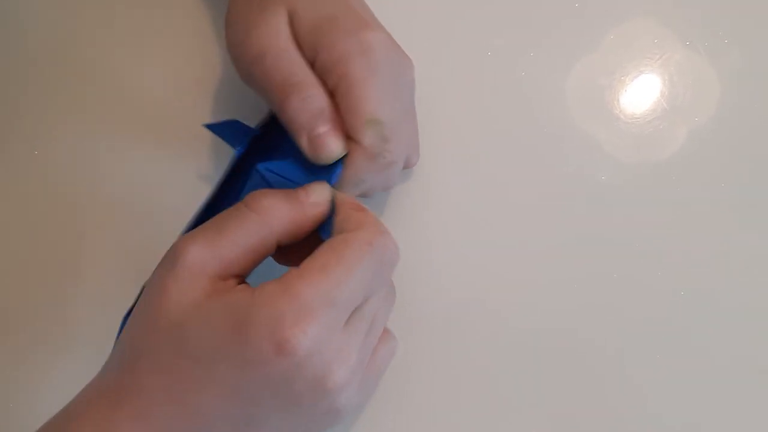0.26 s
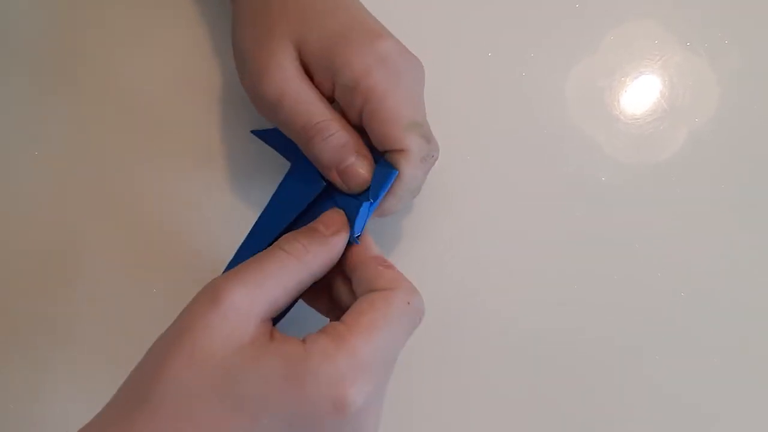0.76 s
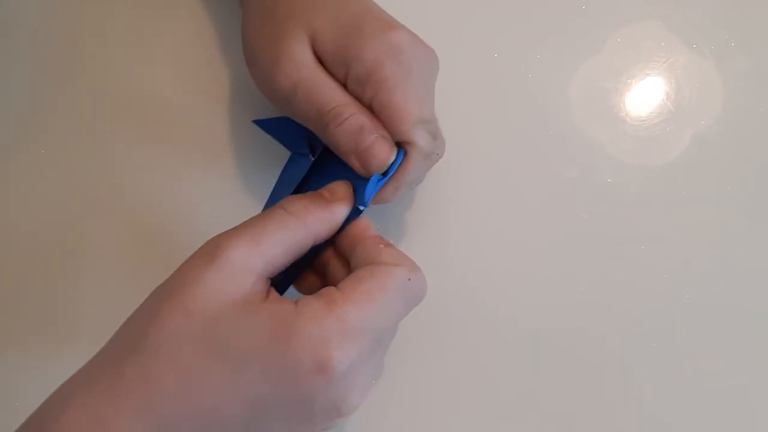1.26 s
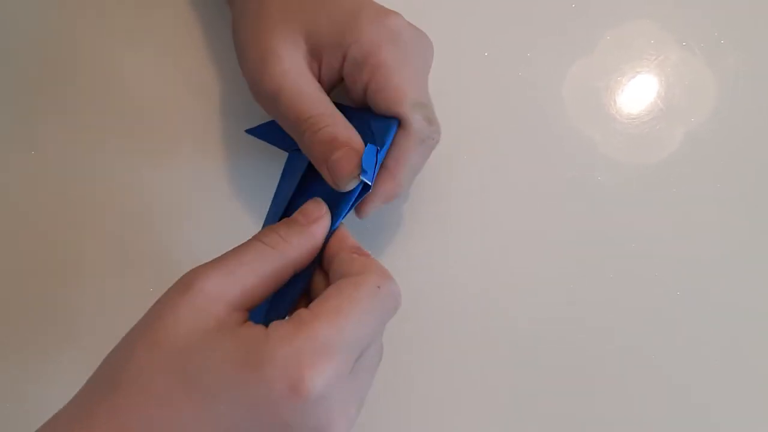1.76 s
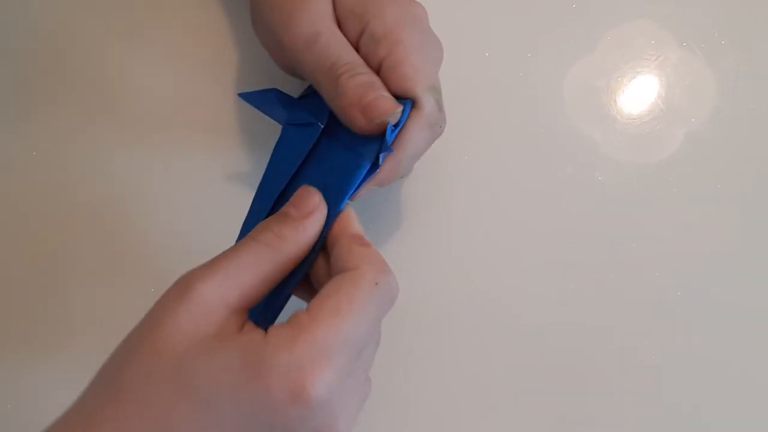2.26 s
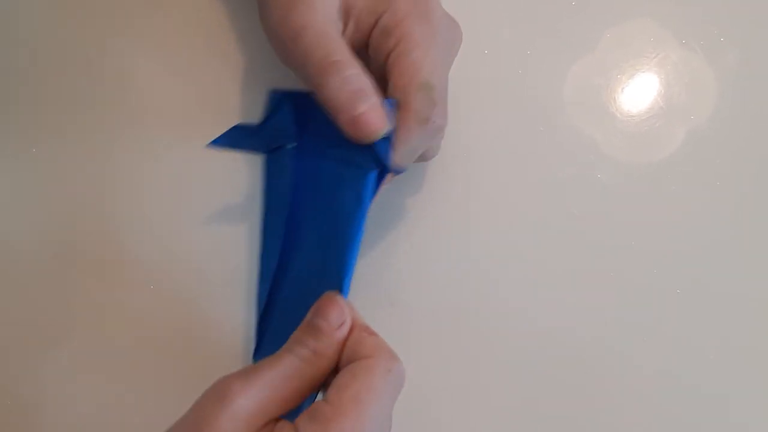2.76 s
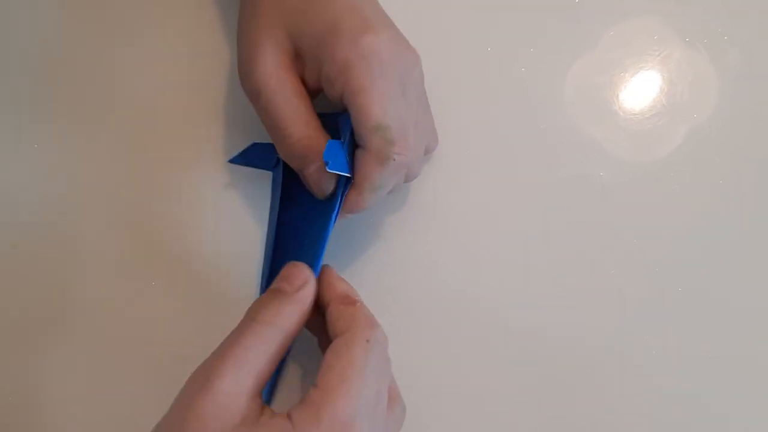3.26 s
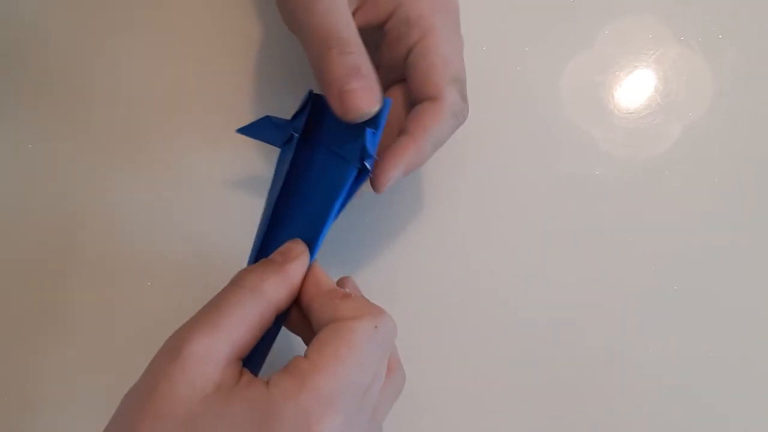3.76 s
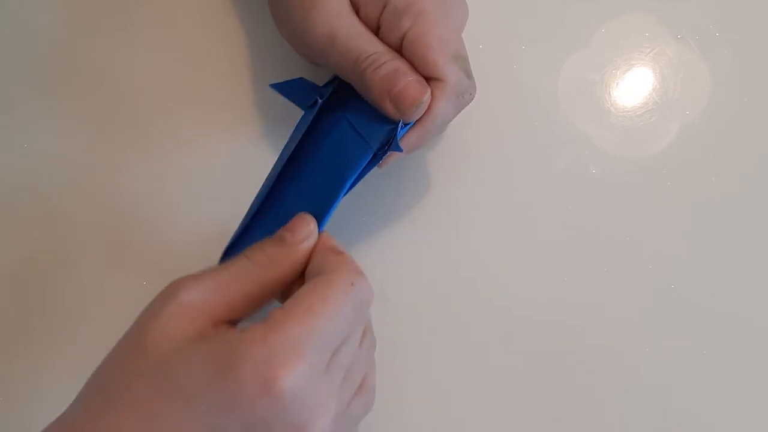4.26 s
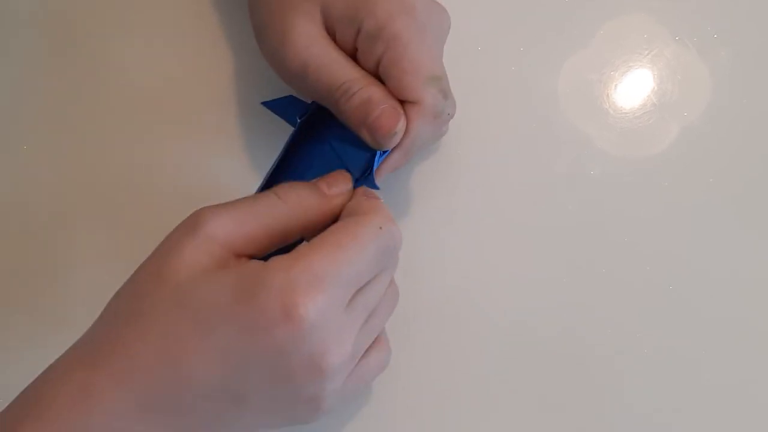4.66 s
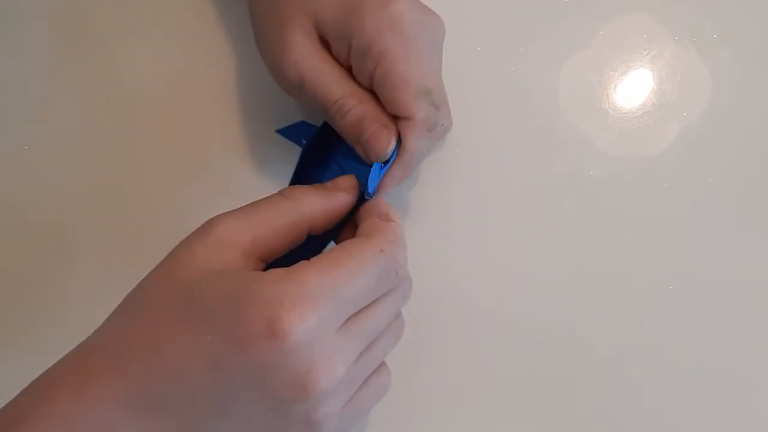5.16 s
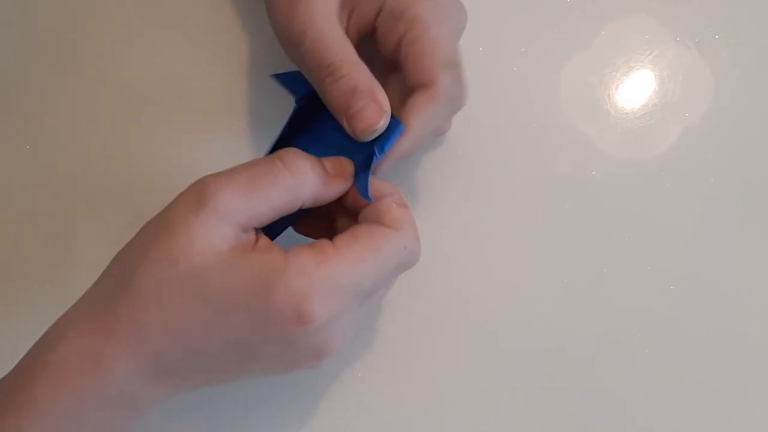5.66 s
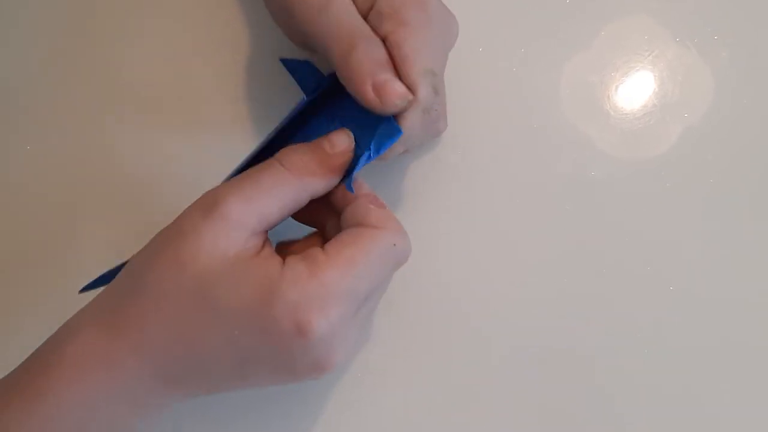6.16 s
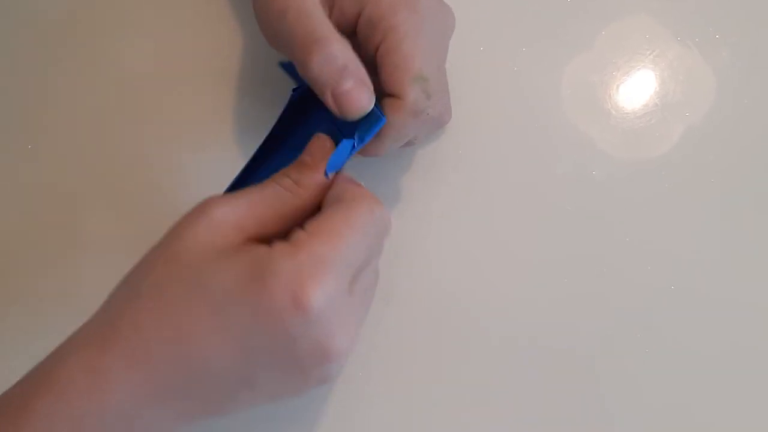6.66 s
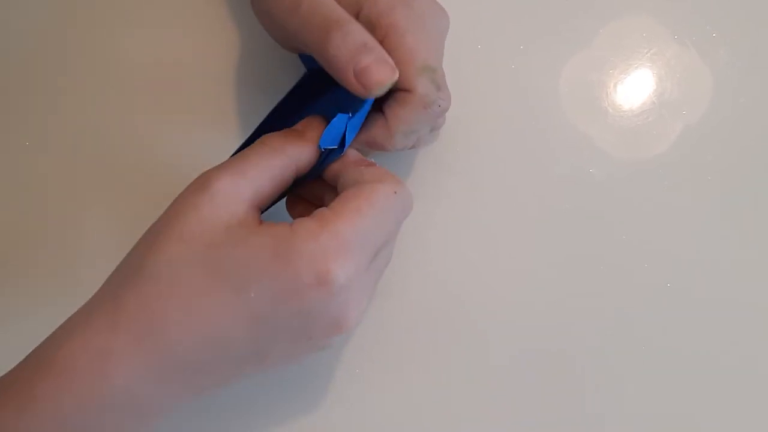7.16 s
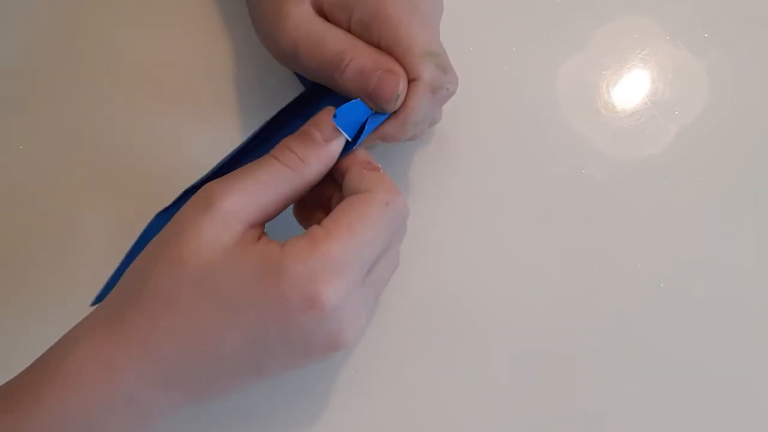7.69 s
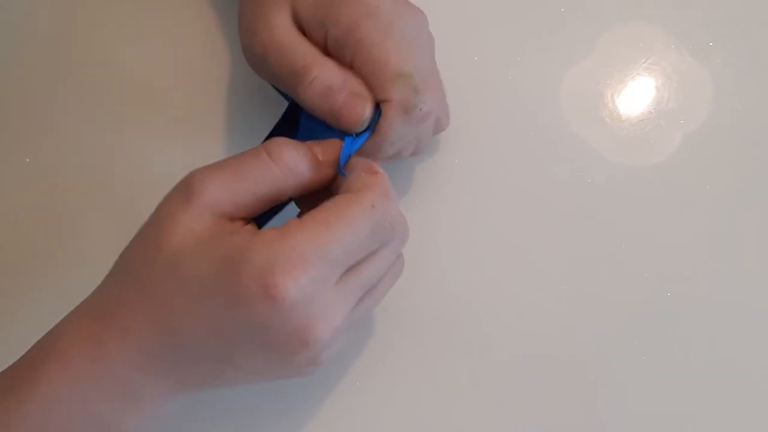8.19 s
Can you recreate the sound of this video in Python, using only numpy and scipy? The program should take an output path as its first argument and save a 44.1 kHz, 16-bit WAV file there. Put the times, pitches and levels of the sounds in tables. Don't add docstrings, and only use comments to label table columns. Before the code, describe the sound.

A small, quiet room with a low, steady ventilation hum and faint hiss; stiff folded paper is worked by fingers close to a stereo microphone. From 0 to 1.1 s there are small dry crackles, short grainy rubs and scuffs, with a soft low wrist drag on the table around 0.3 s. At 1.2 s a loud, bright crease snap rings out, followed by another strong cluster near 1.6 s. Irregular pops, ticks and brief rustles continue, with another wrist drag around 2.4 s, fuller cracks near 2.9 and 3.6 s and a strong one at 4.0 s. After 4.6 s it calms to light rustling and sparse ticks. A hard snap breaks out at 6.4 s, then scattered crackles and rubs. The last clear crease gives at 7.8 s, and tiny ticks and faint rustles settle until about 8.4 s. Room reflections are short and faint.

```python
import sys
import numpy as np
from scipy import signal
from scipy.fft import rfft, irfft, next_fast_len
from scipy.io import wavfile
from scipy.ndimage import uniform_filter1d

SR = 44100
rng = np.random.default_rng(int(sys.argv[2]) if len(sys.argv) > 2 else 0)


def invert_db(x):
    u = np.asarray(x, float) / 20
    return 10 ** u


def wrap_up_sound(samples):
    columns = np.atleast_2d(samples).T
    tamed = np.clip(columns, -1, 1)
    steps = np.round(tamed * 32767).astype(np.int16)
    wavfile.write(sys.argv[1], SR, steps)


N = 371755

# freq_hz, likeness (0 to 1)
ALIKENESS = [(60, 0.55), (290, 0.81), (640, 0.1), (1500, 0.085), (6000, .01)]
# start_s, peak_db, ring_hz, thud_db (re peak), edge_db (re peak)
LONG_CREASES = [(1.196, -7, 5110, -7.5, -6), (1.562, -12, 4170, -39, -3.5), (1.583, -22, 4480, -1, -6),
                (1.636, -25, 1880, 2.5, -4), (1.849, -18, 3540, -17, -11), (1.959, -21.5, 5550, -4.5, -2.5),
                (2.103, -18.5, 4940, -2.5, -8), (2.601, -18, 4020, -14, -44), (2.865, -14, 2000, -5.5, -36),
                (3.151, -21, 4340, -15, -29), (3.429, -22.5, 4630, -5.5, -11),
                (3.542, -20.5, 1970, -6.5, -29), (3.649, -15.5, 2060, -38, -1.5),
                (4.037, -11.5, 2120, -13, -6), (4.29, -23.5, 6900, 2, 1), (4.347, -23.5, 5000, -3.5, -4),
                (4.422, -21, 3360, -4, -23), (4.507, -24, 3200, -1.5, -38), (6.035, -21.5, 5540, -2, -14),
                (6.42, -7.5, 4600, -5, -15), (6.642, -20, 3500, 1, -50), (6.801, -20.5, 6100, -1.5, -9),
                (7.38, -22, 1350, -11, -20), (7.843, -11, 2350, -8, -22)]


def rms_one(x):
    return x / np.sqrt(np.mean(x ** 2) + 1e-20)


def at_hz(points, hz):
    freq_hz, value = np.transpose(points)
    return np.interp(np.log(hz), np.log(freq_hz), value)


def band(x, low_hz, high_hz):
    return signal.sosfilt(signal.butter(2, [low_hz, min(high_hz, .45 * SR)], "band", fs=SR, output="sos"), x)


def resonance(x, hz, width_hz):
    r = np.exp(-np.pi * width_hz / SR)
    poles = [1, -2 * r * np.cos(2 * np.pi * hz / SR), r * r]
    return signal.lfilter([(1 - r * r) / 2, 0, (r * r - 1) / 2], poles, x)


def coloured(x, points):
    size = next_fast_len(N)
    hz = np.arange(1, size // 2 + 2) * SR / size
    return irfft(rfft(x, size) * invert_db(at_hz(points, hz)), size)[:, :N]


def drift(rate_hz):
    knots = rng.standard_normal(4000)
    return np.interp(np.arange(N) * rate_hz / SR, np.arange(len(knots)), knots)


def stereo_bands(source, spectrum):
    edges_hz = 25 * 2 ** np.arange(0, 9.6, .5)
    for k, (low, high) in enumerate(zip(edges_hz, edges_hz[1:])):
        hz = np.sqrt(low * high)
        if hz > spectrum[0][0]:
            mid, side = band(source[k % 2], low, high)
            alike = at_hz(ALIKENESS, hz)
            pair = np.sqrt(1 + alike) * mid + np.sqrt(1 - alike) * side * [[1], [-1]]
            yield hz, invert_db(at_hz(spectrum, hz)) * pair


def room_tone():
    # freq_hz, density_db (per Hz)
    air_colour = [(30, -23), (48, -16.5), (85, -1.5), (160, -1), (300, 0), (430, -13), (720, -12),
                  (1000, -16.5), (2050, -21.5), (3000, -24.5), (4500, -25), (6800, -26.5), (9000, -38),
                  (16000, -20.5)]
    # freq_hz, width_hz, level_db (rms)
    motor_hum = [(52, 10, -70.5), (123.35, 9.9, -69), (179.6, 5, -71), (241.7, 17, -68), (591, 3.6, -86),
                 (657, 3.7, -83.5), (691, 8.7, -79)]
    air_db = -61.5
    mid, side = rng.standard_normal((2, 1, N))
    mid = coloured(mid, [(hz, 10 * np.log10(1 + alike)) for hz, alike in ALIKENESS])
    side = coloured(side, [(hz, 10 * np.log10(1 - alike)) for hz, alike in ALIKENESS])
    air = coloured(mid + side * [[1], [-1]], air_colour)
    white = rng.standard_normal(N)
    hum = np.zeros(N)
    for hz, width_hz, db in motor_hum:
        hum += invert_db(db) * rms_one(resonance(resonance(white, hz, width_hz), hz, width_hz))
    return invert_db(air_db) * rms_one(air) * invert_db(1.5 * drift(2.4)) + hum


def wrists():
    # start_s, length_s, level_db
    drags = [
        (0.234, 0.41, -58.5),
        (2.287, 0.52, -59.5),
        (4.45, 0.23, -66),
        (7.42, 0.23, -70),
    ]
    effort = np.zeros(N)
    for s, length, db in drags:
        start, steps = int(s * SR), int(length * SR)
        effort[start:start + steps] += invert_db(db) * np.hanning(steps)
    both, *own = rng.standard_normal((3, N))
    return effort * rms_one(band(both + 0.65 * np.array(own), 190, 920))


def sing():
    # start_s, length_s, pitch_hz,
    # width_hz, level_db
    sung_tones = [(1.195, 0.1, 1227, 90, -50.5), (1.385, 0.071, 4560, 1200, -43),
                  (3.092, 0.03, 4700, 900, -48), (3.153, 0.06, 4700, 900, -52),
                  (5.483, 0.065, 3640, 400, -54.5), (6.429, 0.19, 4740, 1300, -55),
                  (7.39, 0.17, 873, 199, -61), (7.605, 0.061, 4100, 614, -62),
                  (7.851, 0.036, 775, 99, -55), (7.917, 0.27, 6450, 800, -63.5),
                  (4.044, 0.086, 2426, 500, -57), (4.502, 0.1, 760, 120, -58.5),
                  (5.035, 0.09, 5220, 450, -63), (1.571, 0.026, 700, 200, -50)]
    stick_db, fade_db = 6, -5
    out = np.zeros((2, N))
    for s, length, hz, width_hz, db in sung_tones:
        start, steps = int(s * SR), int(length * SR)
        grip = invert_db(stick_db * np.repeat(rng.standard_normal(SR // 200), 100))
        both, *own = rng.standard_normal((3, len(grip))) * grip
        scrape = (both + 0.69 * np.array(own))[:, :steps]
        tone = resonance(resonance(scrape, hz, width_hz), hz, width_hz)
        fade = invert_db(db + fade_db * np.arange(steps) / steps)
        out[:, start:start + steps] += fade * rms_one(tone) * np.hanning(steps) ** 0.25
    return out


def fibres():
    per_s, size_db, cycles = 800, 3, 7
    sizes = invert_db(size_db * np.minimum(rng.exponential(1, N), 4)) * (rng.random(N) < per_s / SR)
    dealt, sides_db = rng.integers(0, 10, N), rng.normal(0, 2.9, 10)
    out = np.zeros((2, N))
    for k, hz in enumerate(np.geomspace(1500, 7000, 10)):
        ring = resonance(sizes * (dealt == k) + 1e-18, hz, 1.9 * hz / cycles)
        out += ring * invert_db([[sides_db[k]], [-sides_db[k]]]) / np.sqrt(hz)
    return rms_one(out)


def strokes():
    # start_s, length_s, level_db, brightness_db
    slides = [(0.115, 0.062, -54.5, 4), (0.175, 0.14, -56.5, -5), (0.307, 0.18, -62.5, 3),
              (0.398, 0.064, -47, -1.5), (0.471, 0.059, -55, 10), (0.615, 0.11, -53.5, -0.5),
              (0.819, 0.045, -54.5, -3), (1.045, 0.086, -66.5, -12.5), (1.361, 0.088, -46.5, 4),
              (1.498, 0.041, -55.5, 0), (1.821, 0.085, -55.5, -4.5), (2.194, 0.17, -56, 0.5),
              (2.794, 0.17, -59.5, -6.5), (2.93, 0.078, -60.5, -6), (3.079, 0.13, -50.5, 0),
              (3.256, 0.26, -66, -5.5), (3.48, 0.1, -54, -3.5), (4.282, 0.11, -50.5, 5),
              (4.418, 0.13, -61.5, -9), (5.36, 0.079, -64, -7), (5.447, 0.13, -56.5, -4),
              (5.6, 0.1, -65, -9), (5.725, 0.08, -49, 1), (6.5, 0.12, -57, -10.5),
              (6.999, 0.094, -60, -9.5), (7.085, 0.066, -48.5, -3.5), (7.247, 0.11, -82, -17.5),
              (7.45, 0.077, -89, -23), (2.3, 0.12, -50, 8), (7.735, 0.23, -64.5, -2.5)]
    # start_s, length_s, level_db, brightness_db
    settles = [(0, 0.2, -66, 2.5), (0.077, 0.033, -48, 12), (0.725, 0.19, -70, -9), (1.205, 0.13, -61.5, 3),
               (1.279, 0.093, -52, 0), (1.57, 0.025, -25.5, -3), (1.597, 0.25, -68, 7),
               (3.7, 0.051, -60.5, 9), (2.446, 0.08, -85.5, -26), (2.586, 0.15, -62, 10.5),
               (3.597, 0.14, -53.5, -6.5), (3.873, 0.34, -82.5, -15), (4.88, 0.12, -66, -7),
               (5.138, 0.062, -63, -0.5), (5.658, 0.067, -56, 0.5), (6.03, 0.11, -58.5, -10.5),
               (6.13, 0.12, -62, -8.5), (6.43, 0.086, -63, 7.5), (6.626, 0.05, -46, -5.5),
               (6.809, 0.047, -54.5, 4), (6.887, 0.061, -54.5, -0.5), (7.39, 0.068, -76, -22),
               (7.614, 0.16, -59, -3.5), (7.877, 0.13, -62.5, -9.5), (8.177, 0.095, -59.5, -0.5),
               (8.281, 0.08, -56.5, 0)]
    # start_s, length_s, level_db, brightness_db
    scuffs = [(0.21, .012, -49, 6), (0.275, 0.013, -48, 3), (0.311, 0.01, -48, 12), (0.348, 0.0086, -51, 6),
              (0.376, 0.011, -40.5, 1), (0.43, 0.026, -56.5, -11), (2.205, 0.061, -72, 3),
              (6.544, 0.026, -60, 5), (6, 0.13, -69, -11), (6.95, 0.044, -73, -9), (5.4, .009, -51, 0),
              (4.8, .012, -64, -11.5), (5.2, 0.059, -78, 0), (2.13, 0.071, -61, 5), (7.04, 0.043, -62, 2),
              (5.035, 0.081, -67, 1), (5.233, 0.031, -64, -10)]
    lead_s, lead_db = .007, -36
    lead_ins = [(s - lead_s, lead_s, peak_db + lead_db, 0) for s, peak_db, *_ in LONG_CREASES]
    out = []
    for table, swell_db in ((slides, 6.5), (settles, -7), (scuffs, 0), (lead_ins, 6.5)):
        for s, length, db, bright in table:
            out.append((s, length, db, swell_db, -6 - 1.25 * bright, 0.82 * bright))
    return out


def rub():
    # freq_hz, density_db (per Hz)
    paper_colour = [(400, -14.5), (900, -5), (1800, -2), (3000, -9), (4700, -3.5), (6200, -9.5),
                    (8000, -14.5), (16000, -5)]
    landing_db, landing_s, edge_s = 11, 0.0096, 0.001
    flutter_db, patchy_db, pan_db = 4, 3, -1.5
    grains_per_s, grain_db, grain_share_db = 400, 3, -1
    crackle_db, idle_crackle_db = -3, -81
    effort = np.zeros((3, N))
    for s, length, db, swell_db, low_db, bright_db in strokes():
        start, steps = int(s * SR), int(length * SR)
        along = np.arange(steps) / steps
        landing = landing_db * np.exp(-np.arange(steps) / (landing_s * SR))
        lift_off = 9 * along ** 5
        stroke_db = db + swell_db * (along - .5) - lift_off - landing
        effort[:, start:start + steps] += invert_db(stroke_db + np.array([[low_db], [0], [bright_db]]))
    soft = np.exp(-1 / (edge_s * SR))
    effort = signal.lfilter([1 - soft], [1, -soft], effort + 1e-18)
    sizes = invert_db(grain_db * np.minimum(rng.exponential(1, N), 5)) * (rng.random(N) < grains_per_s / SR)
    grit = 1 + invert_db(grain_share_db) * rms_one(uniform_filter1d(sizes, size=30))
    zones = np.zeros((3, 2, N))
    for hz, pair in stereo_bands(grit * rng.standard_normal((2, 2, N)), paper_colour):
        zones[int(hz > 3000) + int(hz > 8000)] += pair * invert_db(patchy_db * drift(25))
    pressure = invert_db(flutter_db * drift(70) + np.array([[.5], [-.5]]) * pan_db)
    hiss = sum(gain * rms_one(zone) for gain, zone in zip(effort, zones))
    return pressure * hiss + invert_db(crackle_db) * (effort[1] + invert_db(idle_crackle_db)) * fibres()


def creases():
    # body_hz, left_right_db
    facets = [(1700, -5.5), (2090, 5), (2030, 1.5), (1950, 2), (900, -3), (2060, -4), (1340, 1), (2160, 1),
              (1510, -2), (1870, 2.5), (2110, -2), (900, -1.5), (1880, -3.5), (1300, -4), (1660, -4),
              (1450, -4), (1850, -3), (820, -9.5), (2070, -0.5), (1900, -3.5), (1780, 1), (1795, -4.5),
              (1230, 1), (1800, -2.5)]
    # start_s, peak_db, ring_hz, thud_db (re peak), edge_db (re peak)
    buckles = [(0.622, -27, 5150, 2.5, -5), (0.665, -28, 6500, -25, -10), (0.679, -26, 5970, -35, -1),
               (1.16, -37.5, 4660, 1.5, 1), (1.309, -28, 3400, -7, -20), (1.384, -25.5, 1900, -37, -20),
               (2.045, -29, 3340, -2.5, -15), (2.293, -26.5, 3500, -3.5, -18), (2.316, -30, 6700, -4, -17),
               (2.325, -25.5, 4650, -3.5, -16), (2.558, -34.5, 5300, -6, -3),
               (2.662, -22.5, 1320, 2.5, -18), (2.871, -18.5, 2050, -3, -4), (3.088, -26, 1800, -27, -6),
               (3.127, -30, 4300, 1.5, -14), (3.352, -31, 4200, -2.5, -16), (3.383, -29, 2090, -28, -16),
               (3.96, -26, 4400, -1.5, 5), (4.474, -27, 1425, -30, -13.5), (4.565, -28.5, 2130, -9, -9),
               (4.893, -26, 4100, -10, -23.5), (4.925, -31.5, 4230, -2.5, -16),
               (5.137, -30.5, 4300, -33, -1.5), (5.39, -34.5, 6770, -34, -21.5),
               (5.683, -32, 4580, -2, -15), (6.399, -26, 4500, -0.5, -14), (6.631, -30.5, 4470, 3.5, 3),
               (6.664, -33, 4010, -11.5, -18.5), (7.105, -21.5, 1644, -38, -21),
               (7.807, -28, 2000, -12, -27), (7.413, -34, 1550, 5.5, -22), (5.233, -40.5, 4380, 0.5, -25),
               (3.876, -45, 1600, 2, -27), (7.901, -42.5, 1700, -11, -30), (7.91, -29, 1700, 1, -19),
               (1.049, -36, 3480, -3.5, -19), (1.518, -33, 4660, -20, -22),
               (7.379, -28, 5720, -24.5, -20.5), (7.842, -18.5, 7400, -20, -30)]
    # start_s, peak_db
    body_ticks = [(0.142, -36.5), (0.232, -28), (0.462, -32), (1.093, -37.5), (1.641, -32), (3.17, -31),
                  (3.674, -27.5), (4.357, -33), (4.971, -39.5), (5.768, -29), (5.775, -35), (6.292, -32),
                  (6.577, -35.5), (6.6, -39), (7.308, -37), (1.075, -49.5), (6.977, -45), (7.008, -43),
                  (7.021, -47), (2.207, -49), (2.64, -35), (0.154, -41), (6.566, -49), (6.538, -44),
                  (6.612, -35), (8.192, -50), (7.637, -38.5)]
    flap_ticks = [(0.099, -36), (0.241, -37), (0.279, -34), (0.288, -36), (0.65, -29.5), (0.7, -32.5),
                  (0.74, -33), (0.816, -35), (0.846, -31), (0.853, -33.5), (1.685, -41), (2.051, -39),
                  (2.266, -43), (2.631, -27), (2.807, -32.5), (3.029, -32.5), (3.269, -38), (3.97, -32.5),
                  (4.004, -37.5), (5.36, -36.5), (5.621, -37), (3.311, -41), (6.06, -34), (6.188, -39),
                  (6.206, -37.5), (6.239, -31.5), (6.701, -35.5), (6.897, -32), (7.035, -37),
                  (7.087, -33.5)]
    pleat_ticks = [(0.086, -33.5), (0.112, -32.5), (0.126, -41), (0.379, -35), (0.406, -32), (0.509, -47),
                   (0.714, -35), (0.751, -40), (0.838, -36.5), (1.205, -30.5), (6.429, -30.5), (3.106, -35),
                   (5.303, -53.5), (0.762, -45), (0.826, -43), (5.04, -56), (5.046, -54), (5.06, -57),
                   (5.088, -56), (6.755, -57), (6.891, -44), (7.043, -45), (5.133, -39.5), (1.114, -44.5),
                   (1.354, -37.5), (1.695, -35.5), (2.477, -50.5), (2.689, -34), (3.1, -40), (3.11, -41.5),
                   (3.433, -33.5), (3.703, -35), (4.807, -40), (5.072, -51), (5.497, -43), (5.662, -38),
                   (5.743, -51), (5.796, -34), (6.508, -39.5), (7.051, -42), (8.204, -41)]
    tip_ticks = [(0.213, -46), (0.316, -34.5), (0.35, -41), (0.481, -41), (1.131, -50), (1.663, -34),
                 (1.775, -56), (1.8, -48), (1.82, -42), (1.836, -45), (2.61, -42), (3.24, -52),
                 (3.651, -18), (4.236, -43), (4.325, -45), (5.48, -39), (4.7, -52), (5.67, -38),
                 (6.39, -36), (6.909, -33.5), (7.265, -59), (7.63, -61), (5.174, -53), (7.681, -36),
                 (7.713, -43.5), (7.754, -45.5), (7.831, -37), (8.136, -54), (8.248, -46), (8.387, -53),
                 (8.406, -54), (8.42, -62)]
    # ring_hz, thud_db (re peak), edge_db (re peak)
    parts = [
        (1550, -4, -13.5),
        (2023, -6, -13),
        (4080, -3, -16),
        (6600, -12, -15.5),
    ]
    # time_s, left_right_db
    fold_pan = [(0, 0), (0.65, -3.5), (1.196, -1.5), (1.57, -1), (2.1, -2.5), (2.86, -1.5), (4.04, 2),
                (6.42, -5), (7.38, -4), (8.43, -2)]
    pitch_scatter = 0.095
    small_body_hz = 1900
    small = list(buckles)
    for ticks, (hz, thud_db, edge_db) in zip((body_ticks, flap_ticks, pleat_ticks, tip_ticks), parts):
        for s, peak_db in ticks:
            ring_hz = hz * np.exp(pitch_scatter * rng.standard_normal())
            small.append((s, peak_db, ring_hz, thud_db, edge_db))
    rows = [(*crease, *facet) for crease, facet in zip(LONG_CREASES, facets)]
    pan_s, pan_db = np.transpose(fold_pan)
    return rows + [(*row, small_body_hz, np.interp(row[0], pan_s, pan_db)) for row in small]


def snaps():
    burst_s, kick_s, spiky_db = 0.002, 0.00058, 4
    ring_width_hz, body_width_hz, broad_db = 600, 1100, -5
    shared = 0.55
    beam_db, push_db = -12, -1.5
    rows = creases()
    size = 512
    t = np.arange(size) / SR
    direct, scattered = np.zeros((2, 2, N + size))
    slips = rng.standard_normal((len(rows), 3, size))
    slips *= invert_db(spiky_db * rng.standard_normal((len(rows), 1, size)))
    attack = 1 - np.exp(-t / .0001)
    volley, kick = attack * np.exp(-t / burst_s), attack * np.exp(-t / kick_s)

    def levelled(x, db):
        return 4 * invert_db(db) * x / np.linalg.norm(x, axis=1, keepdims=True)

    for (s, peak_db, hz, thud_db, edge_db, body_hz, pan_db), (both, *own) in zip(rows, slips):
        own = np.array(own)
        push = np.sqrt(shared) * both + np.sqrt(1 - shared) * own
        ring = levelled(resonance(kick * push, hz, ring_width_hz), peak_db)
        broad = levelled(band(volley * push, 2700, 6780), peak_db + broad_db)
        low_push = band(volley * (both + 0.048 * own), 0.55 * body_hz, 2600)
        thud = levelled(resonance(low_push, body_hz, body_width_hz), peak_db + thud_db)
        edge = levelled(band(volley * own, 7500, 15500), peak_db + edge_db)
        body_push = band(volley * own, 1000, 3000)
        body_push *= np.linalg.norm(thud) / np.linalg.norm(body_push)
        here = slice(int(s * SR), int(s * SR) + size)
        direct[:, here] += invert_db(np.array([[.5], [-.5]]) * pan_db) * (ring + broad + thud + edge)
        scattered[:, here] += invert_db(beam_db) * ring + invert_db(push_db) * body_push + broad + edge
    return direct[:, :N], scattered[:, :N]


def room(x):
    # freq_hz, t60_s, level_db
    walls = [(458, 0.26, -22), (1300, 0.28, -14.5), (3260, 0.25, -15.5), (10000, 0.082, -40)]
    # delay_s, level_db
    echoes = [
        (.0085, -21),
        (0.021, -24),
    ]
    t = np.arange(SR // 3) / SR
    white = rng.standard_normal((2, len(t)))
    answer = np.zeros_like(white)
    onset = np.clip((t - .004) / 0.0006, 0, 1)
    for hz, t60, db in walls:
        tail = band(white, hz / 1.9, hz * 2.5) * invert_db(-60 * t / t60) * onset
        spread = np.mean(tail ** 2) * len(t) * 4.36 * hz / SR
        answer += invert_db(db) * tail / np.sqrt(spread + 1e-20) * .5
    for s, db in echoes:
        answer += invert_db(db) * white[::-1] * np.exp(-((t - s) / 0.0004) ** 2) / 4
    return signal.fftconvolve(x, answer, axes=1)[:, :N]


def scene():
    direct, scattered = snaps()
    hiss = rub() + sing()
    return direct + hiss + room(scattered + hiss) + room_tone() + wrists()


def low_pass(x):
    return signal.sosfilt(signal.butter(12, 17020, fs=SR, output="sos"), x)


def record(dry):
    # freq_hz, gain_db
    housing = [(450, -4), (750, -0.5), (1000, -8.5), (2050, -5), (2900, -10.5), (3600, -4), (5300, -3),
               (5900, -4.5), (6900, 0), (7600, -0.5), (8200, -3.5), (10300, -1.5), (12000, -8),
               (14000, -10)]
    hiss_db = -74
    late = np.stack([dry[0], np.roll(dry[1], shift=2)])
    heard = coloured(late, housing) + invert_db(hiss_db) * rng.standard_normal((2, N))
    top = signal.cheby2(14, 28, 16100, fs=SR, output="sos")
    return low_pass(signal.sosfilt(top, heard))


dry = scene()
out = record(dry)
wrap_up_sound(out)
```